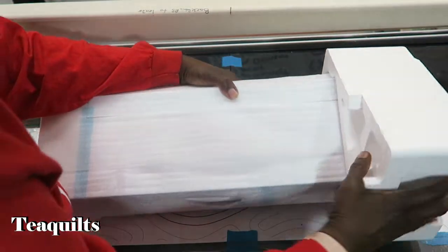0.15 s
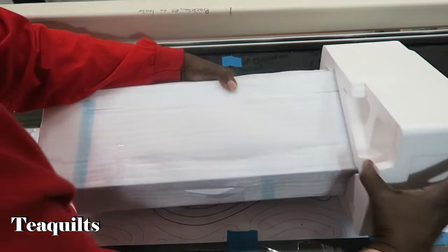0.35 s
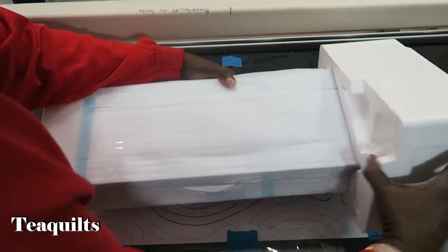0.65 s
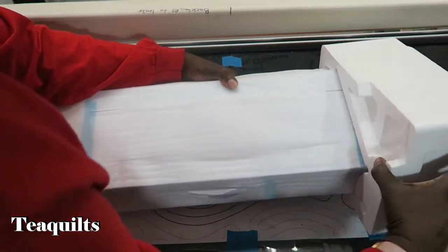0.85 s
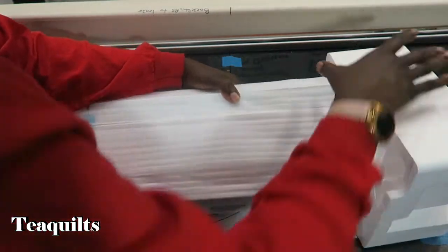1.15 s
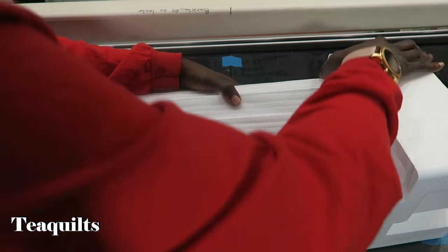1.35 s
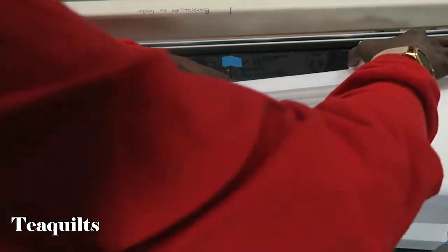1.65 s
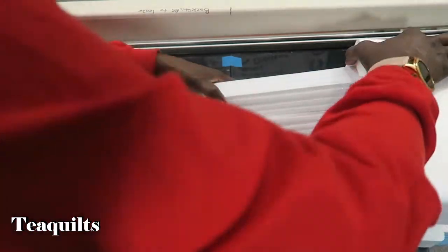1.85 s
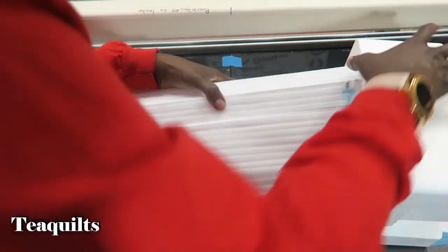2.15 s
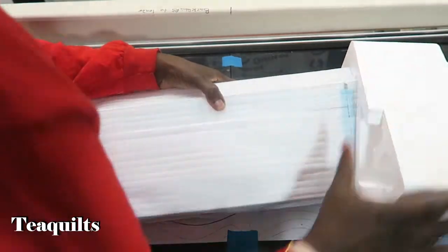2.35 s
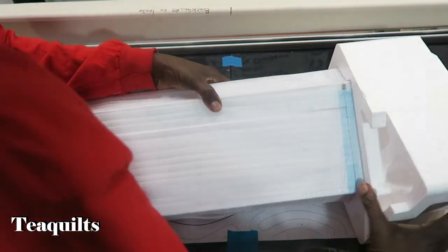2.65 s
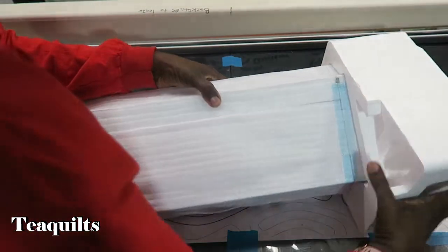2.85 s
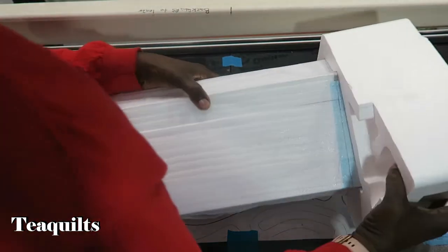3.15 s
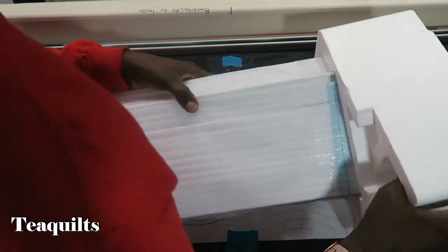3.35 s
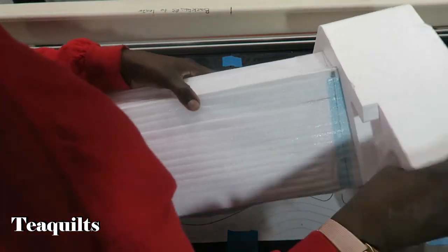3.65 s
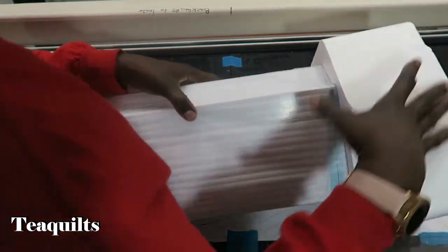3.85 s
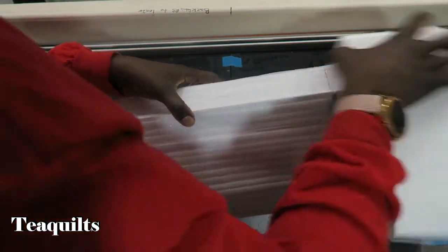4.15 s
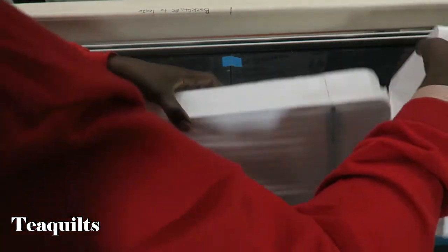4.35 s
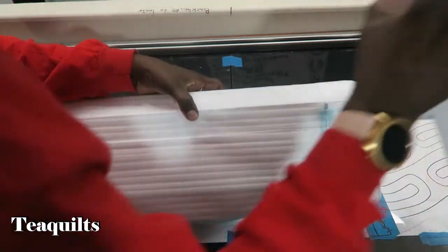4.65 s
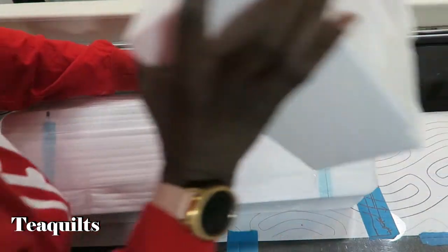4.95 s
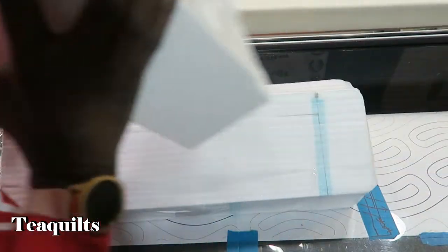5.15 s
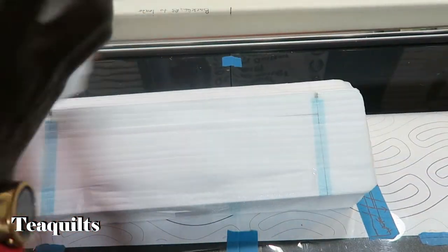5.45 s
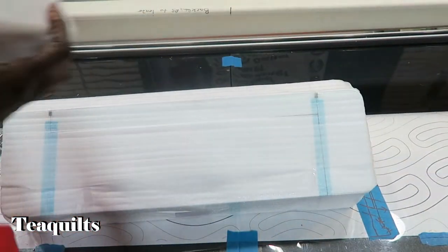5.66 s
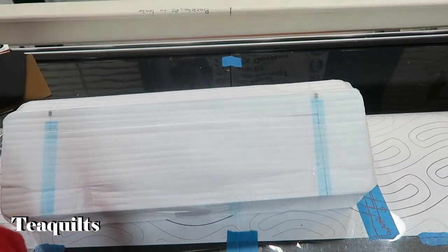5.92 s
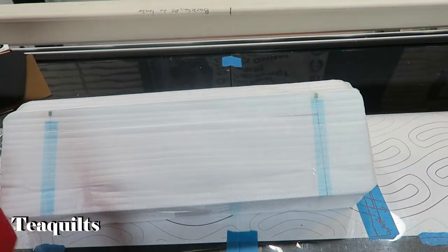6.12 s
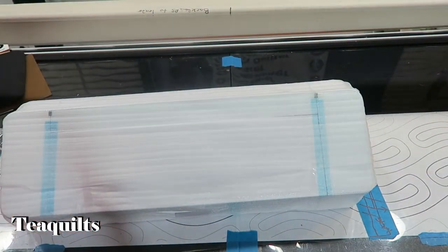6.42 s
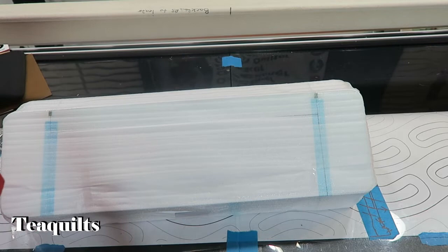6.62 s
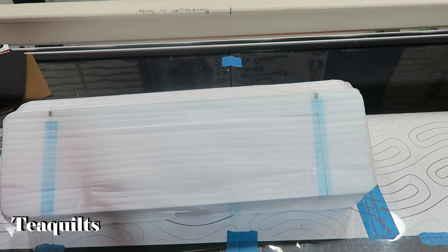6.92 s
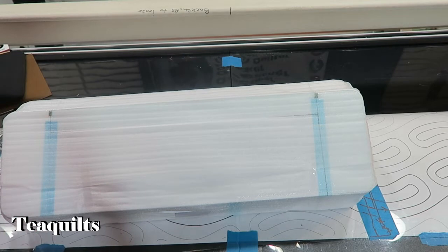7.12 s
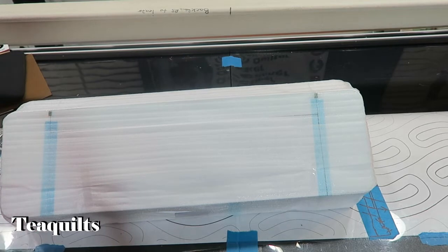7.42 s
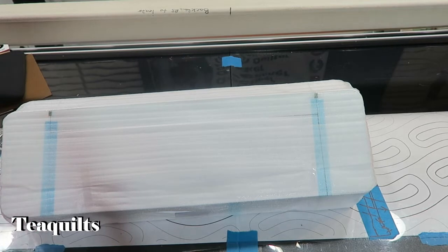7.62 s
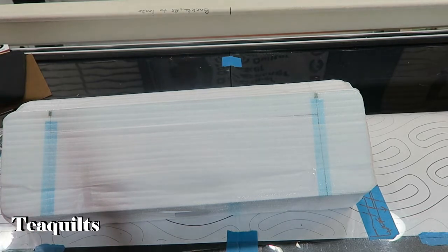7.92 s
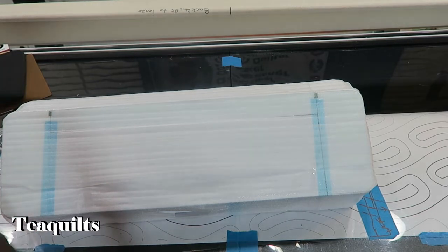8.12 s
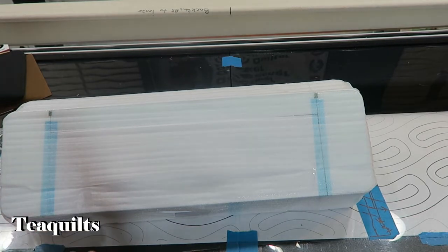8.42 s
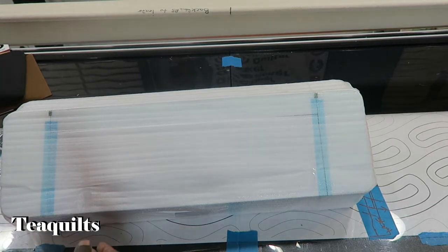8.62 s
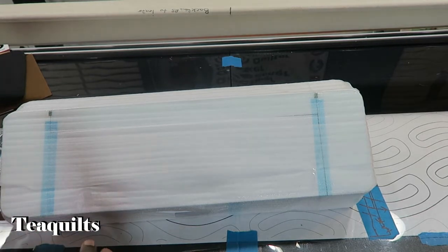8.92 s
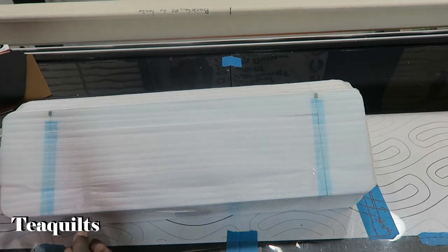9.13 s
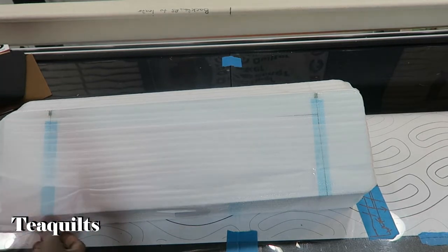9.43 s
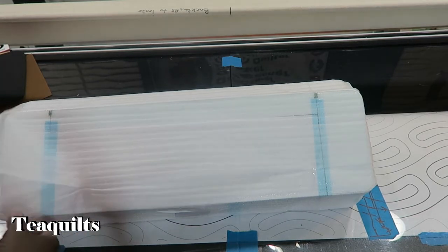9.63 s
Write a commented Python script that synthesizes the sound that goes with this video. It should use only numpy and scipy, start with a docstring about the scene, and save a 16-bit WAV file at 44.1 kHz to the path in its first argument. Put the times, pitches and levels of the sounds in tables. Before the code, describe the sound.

Close up in a small room with faint low air and appliance hum, polystyrene foam is rubbed by hand. From 0.1 s dry, gritty strokes hiss and rasp in uneven bursts, with small hollow knocks at 0.5-0.8 s and duller ones at 1.3-1.8 and 2.2 s. Scraping grows fuller from 2.6 to 3.8 s, with a soft thud at 3.1 and a brief crunch at 3.3. Firmer knocks at 3.85 and 4.2-4.3 s free the cap, which hits the floor at 4.5 s with a loud, boomy slap and short crash. A quieter gap follows, then light wrap rustling from 5.3 to 6.5 s with small taps. At 7.06 s comes a very loud hollow knock, smaller bumps to 7.9, a heavy double bump with rasping around 8.5-8.65, then faint crackling rustles and a light tap at 9.6 s.

```python
"""Foam packing worked off a machine

A polystyrene end cap is worked off a machine wrapped in foam sheet, close by in a small room.
Stick-slip friction makes the strokes: dense tiny clicks, coloured and shaped by stroke envelopes.
Blows excite decaying modes of the hollow cap and a wavering note of the struck wall; low noise thuds
lie under some of them. The cap drops to the floor as shaped noise over a decaying tone; then the wrap
rustles and the other end bumps and scrapes. Filtered noise and sine waves give faint room air and hum."""
import sys
import numpy as np
from scipy import signal
from scipy.fft import rfft, irfft, next_fast_len
from scipy.io import wavfile
from scipy.ndimage import map_coordinates

SR = 44100
rng = np.random.default_rng(int(sys.argv[2]) if len(sys.argv) > 2 else 0)


def wav_record(signal):
    """Record a signal, one row per channel, as 16-bit PCM in the file named by sys.argv[1]."""
    frames = np.transpose(np.atleast_2d(signal))
    bounded = np.clip(frames, -1, 1)
    # unit amplitude maps onto the largest positive 16-bit level
    quanta = np.round(bounded * 32767).astype(np.int16)
    wavfile.write(sys.argv[1], SR, quanta)


N = 431298
TIME = np.arange(N) / SR


def undb(db):
    """Decibels to gain."""
    return 10 ** (np.asarray(db) / 20)


def unit(x):
    """Scale to rms 1."""
    return x / np.sqrt(np.mean(x ** 2))


def colour(x, points):
    """Linear filtering: weight the spectrum by (Hz, dB) points, joined along log frequency."""
    hz, db = np.transpose(points)
    size = next_fast_len(len(x) + 4096)
    f = np.maximum(np.fft.rfftfreq(size, 1 / SR), 1)
    gain = undb(np.interp(np.log(f), np.log(hz), db))
    return irfft(rfft(x, size) * gain, size)[:len(x)]


def band(x, low_hz, high_hz, order=2):
    """Band limiting: a causal high-pass, then a low-pass."""
    for hz, kind in (low_hz, "high"), (high_hz, "low"):
        sections = signal.butter(order, min(hz, SR / 2 - 1), kind, fs=SR, output="sos")
        x = signal.sosfilt(sections, x)
    return x


def walk(rate):
    """Random modulation: a slow wander of rms 1 through `rate` random knots a second."""
    knots = rng.standard_normal(int(N / SR * rate) + 2)
    return unit(np.interp(TIME * rate, np.arange(len(knots)), knots))


def tail(t60, size=16000):
    """Reverberation: dense reflections of unit energy that fall 60 dB in t60 seconds."""
    h = rng.standard_normal(size) * np.exp(-np.log(1000) * TIME[:size] / t60)
    return h / np.linalg.norm(h)


def ring(x, response):
    """Convolution: pass a sound through an impulse response."""
    return signal.oaconvolve(x, response)[:len(x)]


def contact(t, length, release):
    """Hold and release: an envelope held for `length` seconds, then an exponential decay."""
    return np.exp(-np.maximum(t - length, 0) / release)


# Spectrum of the room air. Each row: frequency in Hz, relative level in dB per Hz.
ROOM_TONE = [(25, -11), (60, -18), (100, -2), (160, -13.5), (420, -12.5), (800, -23), (1200, -25.5),
             (3000, -40), (7000, -73.5), (15000, -62)]
# Stereo spread of the diffuse air. Each row: frequency in Hz, side minus mid in dB.
ROOM_WIDTH = [(60, -37), (110, -13), (200, -1), (500, 0.5), (2000, 7.5)]
# Partials of the hum. Each row: frequency in Hz, level in dB about which it wanders.
HUM = [(61, -62), (102, -61), (181, -64), (237, -65)]


def background():
    """Diffuse field and steady tones: wavering noise differs at the two ports, appliance hum is central."""
    air, around = (unit(colour(rng.standard_normal(N), ROOM_TONE)) * undb(-55.0 + 3.6 * walk(3.9))
                   for _ in range(2))
    side = colour(around, ROOM_WIDTH)
    hum = np.zeros(N)
    for hz, db in HUM:
        hum += np.sqrt(2) * undb(db + 2.5 * walk(19)) * np.sin(2 * np.pi * hz * TIME)
    return air + hum + np.array([side, -side])


# Low thuds under some of the blows.
# Each row: start in seconds, level in dB, length in seconds before the release.
THUDS = [(1.342, -36, .04), (1.583, -38.5, 0.089), (2.662, -38.5, 0.068), (3.066, -39, 0.015),
         (3.841, -27, 0.043), (4.284, -36, 0.053), (5.765, -32, 0.021), (7.057, -23.5, 0.019),
         (7.367, -33.5, 0.022), (7.611, -30.5, 0.013), (8.50, -37, 0.084), (8.60, -28.5, 0.072)]
# Spectrum of the low thuds. Each row: frequency in Hz, relative level in dB per Hz.
THUD_SPECTRUM = [(25, -24), (60, 4), (78, 4.5), (112, 1.5), (175, -7), (300, -35.5)]


def thuds(size=16000):
    """Shaped low noise: a low boom held briefly, then dying away exponentially."""
    t, out = TIME[:size], np.zeros(N + size)
    for s, db, length in THUDS:
        boom = colour(rng.standard_normal(size), THUD_SPECTRUM)
        boom *= np.minimum(t / 0.003, 1) * contact(t, length, release=0.023)
        energy = np.sum(boom ** 2) / SR
        start = int(s * SR)
        out[start:start + size] += boom * undb(db) / np.sqrt(energy / length)
    return out[:N]


THUMP_HZ, THUMP_DB, THUMP_DECAY_S = 125, 2, 0.0052  # air squeezed out of the cap's hollow
# The loose cap hitting the floor. Each row: frequency in Hz, relative level in dB per Hz.
DROP = [(30, -20), (92, 6), (142, -4), (245, 5.5), (520, 2.5), (750, -5.5), (1300, -10), (2400, -20),
        (5000, -38), (12000, -46.5)]


def drop(s=4.519):
    """Impact and reverberation: a slap and a thump of trapped air, then a dense crash of reflections."""
    t = np.maximum(TIME - s, 0)
    slap = undb(-1.5) * np.minimum(t / 0.0019, 1) * contact(t, length=0.0078, release=0.0012)
    thump = undb(THUMP_DB) * np.sin(2 * np.pi * THUMP_HZ * t) * np.exp(-t / THUMP_DECAY_S)
    reflections = undb(-14.0) * np.minimum(t / 0.023, 1) * np.exp(-(t / 0.11) ** 3)
    crash = (slap + reflections) * unit(colour(rng.standard_normal(N), DROP))
    return band(thump, 55, 2000) + crash


WALL_DECAY_S, WALL_WAVER = 0.01, 0.076  # the waver is the rms share of the note
OVERTONE_RATIO, OVERTONE_DB = 1.65, -7.5


def wall(force, hz):
    """Forced resonance: the wall's note builds under the force, wavers at random in pitch and dies away."""
    swell = ring(force, np.exp(-TIME[:len(force)] / WALL_DECAY_S))
    waver = unit(band(rng.standard_normal(len(force)), 9.6, 77))
    phase = 2 * np.pi * np.cumsum(hz * (1 + WALL_WAVER * waver)) / SR
    note = np.sin(phase) + undb(OVERTONE_DB) * np.sin(OVERTONE_RATIO * phase)
    return unit(swell * note)


WALL_DB = -1  # wall note relative to the rest of the blow
JUDDER_PER_S = 2500  # mean rate of slips
GRIP_DB, LET_GO_S = -7, 6.5  # the ring is weaker while the hands hold the foam
LOWEST_RING = 0.6  # the block radiates little below this share of the wall's note
# Modes of the hollow foam cap.
# Each row: mean frequency in Hz, relative level in dB, 60 dB decay time in seconds.
CAP_MODES = [(93, -3.5, 0.16), (176, 6.5, 0.072), (251.5, 9, 0.057), (283.4, -7.5, 0.22), (380, 5.5, 0.03),
             (460.2, 1.5, 0.22), (557, 9.5, 0.03), (626, -8, 0.21), (824, -3.5, 0.1), (1010, 3.5, 0.019),
             (1520, 1.5, 0.081)]
# Blows on the foam blocks. Each row: start in seconds, level in dB, mean note of the struck wall in Hz,
# contact brightness (low-pass corner) in Hz, judder length in seconds.
KNOCKS = [(0.506, -26, 406, 1500, 0.031), (0.636, -29, 633, 1370, 0.01), (0.751, -29.5, 325, 900, 0.034),
          (0.813, -28.5, 937, 1400, 0.0086), (1.345, -28.5, 235, 600, 0.026), (1.579, -33, 394, 600, 0.008),
          (1.609, -33, 245, 700, 0.022), (1.664, -29, 630, 786, 0.008), (1.793, -23.5, 396, 840, 0.023),
          (2.216, -28.5, 243, 600, 0.041), (2.662, -31.5, 184, 260, 0.024), (3.065, -21, 205, 250, 0.0075),
          (3.843, -21, 262, 650, 0.018), (3.866, -19.5, 371.4, 930, 0.028), (4.092, -32.5, 306, 700, 0.011),
          (4.207, -20, 249, 800, 0.0079), (4.284, -17.5, 240, 1400, 0.0046),
          (4.324, -28.5, 471, 805, 0.022), (5.15, -36, 373, 905, 0.031), (5.494, -32.5, 168, 1040, 0.0065),
          (5.773, -28.5, 282, 1000, 0.012), (6.789, -31, 515, 750, 0.0077), (7.064, -7, 348.4, 840, 0.013),
          (7.081, -22, 332, 890, 0.015), (7.152, -24, 297, 900, 0.03), (7.287, -31.5, 233, 1200, 0.011),
          (7.362, -20.5, 470, 1380, 0.013), (7.373, -20, 263, 600, 0.025), (7.485, -29.5, 235.3, 250, .02),
          (7.772, -22, 402.5, 490, 0.024), (7.804, -29.5, 271, 424, 0.07), (7.937, -33, 287, 298, 0.011),
          (8.053, -39, 198, 900, .008), (8.493, -23, 286, 300, 0.013), (8.526, -19, 230, 1400, 0.02),
          (8.562, -20.5, 265.6, 950, 0.043), (8.598, -13, 178.4, 630, 0.027),
          (8.628, -12, 279.5, 250, 0.016), (8.706, -27, 258.6, 308, .027), (9.644, -26, 597, 710, 0.0073)]


def knocks(size=16000):
    """Modal excitation: a blow and its judder ring wall and cap; softer contacts are duller."""
    t, out = TIME[:size], np.zeros(N + size)
    hz, mode_db, t60 = np.transpose(CAP_MODES)[:, :, None]
    fades = undb(mode_db) * np.exp(-np.log(1000) * t / t60)
    for s, db, note_hz, bright_hz, length in KNOCKS:
        # the hold on the block detunes its modes from blow to blow
        held_hz = hz * (1 + 0.028 * rng.standard_normal(hz.shape))
        modes = np.sum(fades * np.cos(2 * np.pi * held_hz * t), axis=0)
        body = undb(-42.5 + GRIP_DB * (s < LET_GO_S)) * modes
        body[0] += 1  # the struck face radiates directly
        # small separate slips start as the foam gives, before the blow lands
        give = 0.00388
        judder = (rng.random(size) < JUDDER_PER_S / SR) * rng.standard_normal(size)
        force = judder * np.minimum(t / give, 1) * contact(t, length, release=0.0053 + 0.15 * length)
        force[int(give * SR)] += 1.1
        blow = unit(band(ring(force, body), LOWEST_RING * note_hz, bright_hz))
        wall_force = contact(t, 0.76 * length, release=0.0017)
        blow += undb(WALL_DB) * wall(wall_force, note_hz)
        energy = np.sum(blow ** 2) / SR
        start = int(s * SR)
        out[start:start + size] += blow * undb(db) / np.sqrt(energy / (length + give))
    return out[:N]


# The foam snaps free with a brief crunch.
# Each row: start in seconds, envelope level in dB, length in seconds before the release.
SCRAPES = [(0.752, -45, 0.018), (0.809, -36, 0.013), (3.31, -35, 0.013), (4.278, -33, 0.0074),
           (5.502, -46, 0.0078), (5.535, -47, 0.0031), (7.06, -42, 0.0058), (7.363, -59, 0.01),
           (8.055, -54, .008), (8.528, -40.5, 0.019), (9.232, -44, 0.0042), (9.525, -41, 0.0067)]


def scrapes():
    """Sudden release of friction: envelope of short runs of slips when the foam lets go."""
    push = np.zeros(N)
    for s, db, length in SCRAPES:
        start = int(s * SR)
        t = TIME[:min(SR // 4, N - start)]
        run = np.minimum(t / 0.0076, 1) * contact(t, length, release=0.0092)
        push[start:start + len(t)] += undb(db) * run
    return push


STROKE_EDGE_DB = 10.5  # fall from the peak after one speeding-up or slowing-down time
RISE_CURVE, FALL_CURVE = 1.57, 1.43  # 1 = straight in dB, 2 = bell
# The wrap stirring between strokes: envelope levels of hiss, rasp and fine treble, each in dB.
RESTING_DB = (-67.5, -60.5, -82)
# Strokes of foam on foam; a firm grip rasps, a light touch is airy.
# Each row: start in seconds, speeding-up time in seconds, slowing-down time in seconds,
# hiss envelope peak in dB, rasp envelope in dB over the hiss, fine treble envelope in dB over the hiss.
STROKES = [ (0.113, .13, 0.18, -32, -1, -12.5), (0.37, 0.054, 0.11, -35, 3, -19),
           (0.50, 0.031, 0.032, -36.5, 7.5, -17), (0.61, 0.056, 0.068, -41.5, 5.5, -14.5),
           (0.746, 0.015, 0.043, -30.5, 2.5, -21), (0.805, 0.027, 0.055, -43.5, 9, -17),
           (0.952, 0.044, 0.023, -34.5, -5.5, -7.5), (1.095, 0.044, 0.022, -43, 5, -4.5),
           (1.342, 0.0049, 0.097, -47, 11.5, 1.5), (1.363, 0.059, 0.095, -38.5, 5.5, -11),
           (1.555, 0.037, 0.13, -40, 6, -16.5), (1.879, 0.018, 0.29, -52.5, 9.5, -14),
           (2.136, 0.023, 0.066, -37, 0, -11.5), (2.386, 0.011, 0.035, -35.5, -4.5, -7.5),
           (2.52, 0.013, 0.022, -48.5, -4, -7), (2.589, 0.04, 0.023, -47.5, 6.5, -5),
           (2.646, 0.019, 0.046, -32, 1, -6.5), (2.714, 0.03, 0.12, -28.5, -3.5, -18),
           (2.85, 0.044, 0.021, -35, -1.5, -11), (2.924, 0.032, 0.12, -30.5, -11, -9),
           (3.13, 0.12, 0.036, -39, 4, -10), (3.308, 0.014, 0.31, -34.5, -4.5, -32),
           (3.34, 0.083, 0.15, -32, -16, -10.5), (3.60, 0.042, 0.039, -35.5, -20, -23),
           (3.68, 0.091, 0.13, -32, -7.5, -12.5), (3.85, 0.018, 0.18, -46, 13, -13),
           (4.07, 0.088, 0.11, -39.5, 0.5, -10.5), (4.246, 0.042, 0.089, -32, 4, -13),
           (5.06, 0.11, 0.12, -59, 9.5, -25), (5.318, 0.03, 0.024, -39, 0, -8),
           (5.498, 0.0052, 0.02, -44.5, 6, -15.5), (5.745, 0.0079, 0.12, -38.5, 5.5, -2.5),
           (5.81, 0.082, 0.16, -35.5, 0, -16), (6.08, 0.087, 0.1, -36, -4, -13.5),
           (6.27, 0.07, 0.099, -41, -2, -9.5), (6.43, 0.03, 0.059, -41, -8, -17),
           (6.61, 0.04, 0.057, -55, -12, -15), (6.788, 0.0084, 0.18, -46, 1, -18),
           (6.96, 0.067, 0.24, -55, 5.5, -11), (7.284, 0.0066, 0.21, -51.5, 13.5, -11),
           (7.52, 0.3, 0.037, -43.5, 2.5, -11), (7.90, 0.029, 0.21, -52, 7.5, -12),
           (8.12, 0.061, 0.033, -52, 1, -10), (8.488, 0.004, 0.065, -42, 9.5, 0.5),
           (8.53, 0.086, 0.082, -38, 10, -9.5), (8.70, 0.027, 0.029, -38, 0.5, -7),
           (8.94, 0.066, 0.25, -54.5, 8, -7), (9.076, 0.027, 0.02, -38, 5.5, -4.5),
           (9.19, 0.16, 0.16, -54, 4.5, -1.5), (9.467, 0.019, 0.27, -46.5, 1.5, -8),
           (9.71, 0.059, 0.052, -42, 3.5, -14)]


def strokes():
    """Speed-dependent friction: hiss, rasp and treble envelopes swell and fade, summed as power."""
    power = undb(RESTING_DB)[:, None] ** 2 * np.ones(N)
    for s, rise, fall, db, rasp_db, fine_db in STROKES:
        near = slice(*np.searchsorted(TIME, [s - 2 * rise, s + rise + 4 * fall]))
        t = TIME[near] - s - rise
        rising, falling = np.abs(t / rise) ** RISE_CURVE, np.abs(t / fall) ** FALL_CURVE
        from_peak = np.where(t < 0, rising, falling)
        swell = undb(db - STROKE_EDGE_DB * from_peak)
        power[:, near] += undb([[0], [rasp_db], [fine_db]]) ** 2 * swell ** 2
    return np.sqrt(power)


CATCHES_PER_S, CATCH_DB = 170, 3.5  # mean rate; the most a catch lifts the level over the valleys


def catches():
    """Stick-slip of the whole face: at uneven moments it lets go with a sudden scratch that fades."""
    jolts = (rng.random(N) < CATCHES_PER_S / SR) * rng.random(N)
    scratches = ring(jolts, np.exp(-TIME[:SR // 20] / 0.0037))
    return unit(undb(CATCH_DB * np.minimum(scratches, 1)))


def slips(rate, spread_db):
    """Microscopic stick-slip: foam beads give tiny clicks of unequal size, `rate` a second on average."""
    happens = rng.random(N) < rate / SR
    size_db = spread_db * np.clip(rng.standard_normal(N), -2, 2)
    return unit(happens * rng.standard_normal(N) * undb(size_db))


def shifting(x, depth_db, rate, count):
    """Randomly wandering coloration: narrow bands of the rubbing swell and fade independently."""
    f, t, frames = signal.stft(x, SR, nperseg=512)
    band_place = count * np.sqrt(f / f[-1])
    chance = rng.standard_normal((count + 2, int(t[-1] * rate) + 2))
    grid = np.meshgrid(band_place, t * rate, indexing="ij")
    wander = map_coordinates(chance, grid, order=1)
    return unit(signal.istft(frames * undb(depth_db * wander), SR)[1][:N])


# Light slips. Each row: frequency in Hz, relative level in dB per Hz.
HISS = [(300, -4.5), (1200, -1), (2400, -0.5), (3400, -0.5), (4600, -4.5), (6500, -9.5), (9000, -19),
        (15000, -27)]
# The finest slips. Each row: frequency in Hz, relative level in dB per Hz.
FINE = [(2000, -29), (5500, -7.5), (12200, -3), (15500, -11.5)]
# Coarse slips. Each row: frequency in Hz, relative level in dB per Hz.
RASP = [(50, -13), (110, -10), (200, -1.5), (330, 7), (600, 4.5), (1000, -0.5), (1700, -3.5), (2600, -7.5),
        (4200, -35), (9000, -68)]
# Stereo spread of the rubbing. Each row: frequency in Hz, side minus mid in dB.
WIDTH = [(70, -14), (250, -6), (1000, -20), (2500, -21.5), (4500, -9), (8000, -3.5), (12000, 1.5)]


def rubbing():
    """Stick-slip friction: light slips hiss, a firm grip adds coarse ones; the treble scatters widely."""
    sliding, rasping, airy = strokes()
    stroke = sliding * catches()
    grip, touch = rasping / sliding, airy / sliding
    push = scrapes()
    views = []
    for _ in range(2):
        beads = shifting(slips(rate=14000, spread_db=0.0), depth_db=5.0, rate=32, count=240)
        coarse = shifting(slips(rate=4000, spread_db=1.5), depth_db=8.5, rate=22, count=180)
        light = undb(1.46) * unit(colour(beads, HISS))
        fine = undb(3.13) * touch * unit(colour(beads, FINE))
        hiss = light + fine
        rasp = grip * unit(colour(coarse, RASP))
        # creases of the wrap snap singly; the square root favours them in light rubbing
        snaps = ring(slips(rate=33, spread_db=0.0), tail(t60=0.047, size=1024))
        creases = undb(-34.5) * np.sqrt(stroke) * unit(colour(snaps, HISS))
        views.append((stroke + push) * hiss + stroke * rasp + creases)
    mid, side = views[0], colour(views[1], WIDTH)
    return np.array([mid + side, mid - side])


PORT_TILT_DB = -23.5  # the work is a little louder at the right: side minus mid above the bass


def scene():
    """Superposition and reverberation: close foam in a small room moves from the right end to the left."""
    foam = rubbing() + knocks() + thuds() + drop()
    centre = foam.mean(axis=0)
    room = undb(-7.5) * band(ring(centre, tail(t60=0.22)), 116, 4300)
    room_side = undb(-18.0) * band(ring(centre, tail(t60=0.19)), 370, 5000)
    # a small lag between the ports appears as a side signal that grows with frequency
    lead_samples = np.interp(TIME, [4.6, 5.6], [-.6, 1])  # positive: the left port leads
    lag_side = lead_samples * np.gradient(centre) / 2
    tilt_side = undb(PORT_TILT_DB) * band(centre, 130, 4300, order=1)
    side = room_side + lag_side - tilt_side
    return foam + room + np.array([side, -side]) + background()


TOP_HZ = 15600  # upper cutoff
# Top end of the microphone, with a narrow notch. Each row: frequency in Hz, gain in dB.
MIC = [(12600, 0), (13080, -17), (13350, -4), (15500, -14)]


def record(dry):
    """Overload and band limiting: peaks beyond full scale clip, then the top is dulled and cut."""
    clipped = np.clip(dry, -1, 1)
    dulled = np.array([colour(port, MIC) for port in clipped])
    cutoff = signal.ellip(8, .2, 70, TOP_HZ, fs=SR, output="sos")
    return signal.sosfilt(cutoff, dulled)


dry = scene()
out = record(dry)
wav_record(out)
```